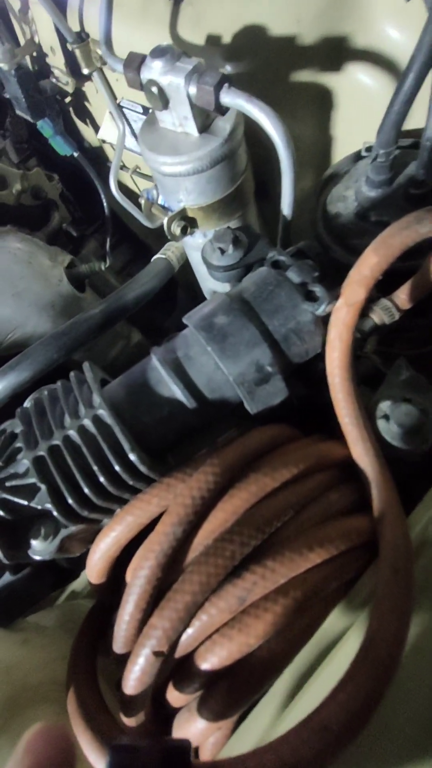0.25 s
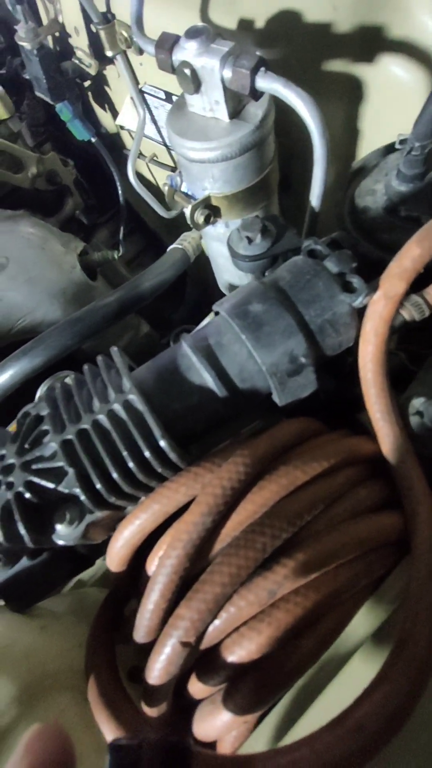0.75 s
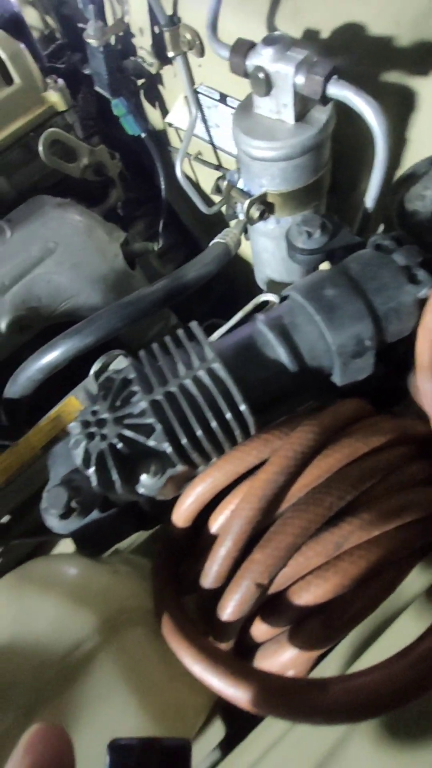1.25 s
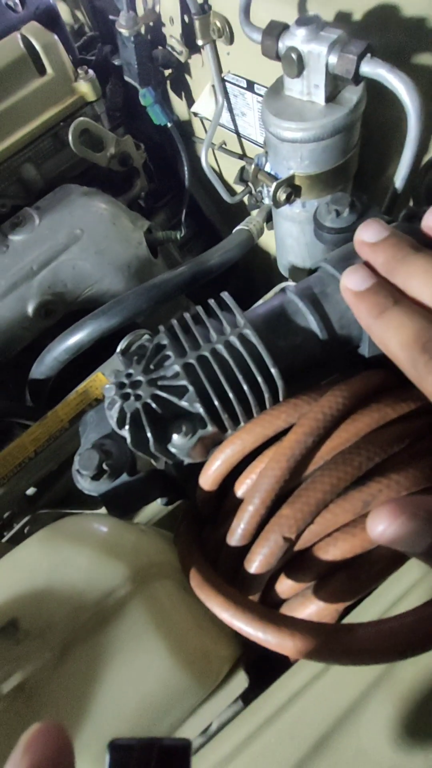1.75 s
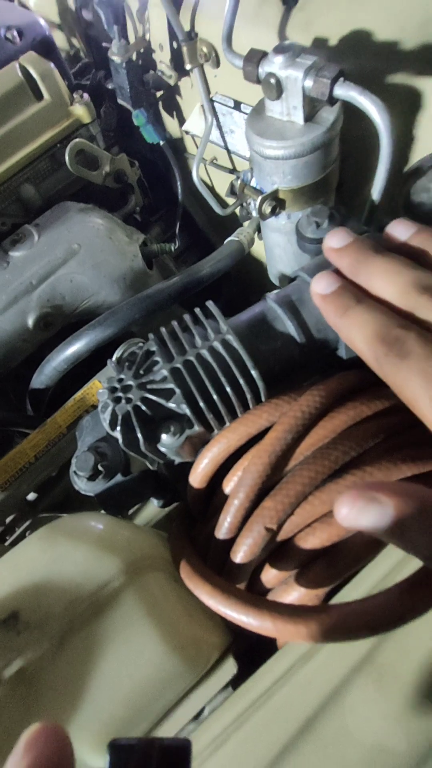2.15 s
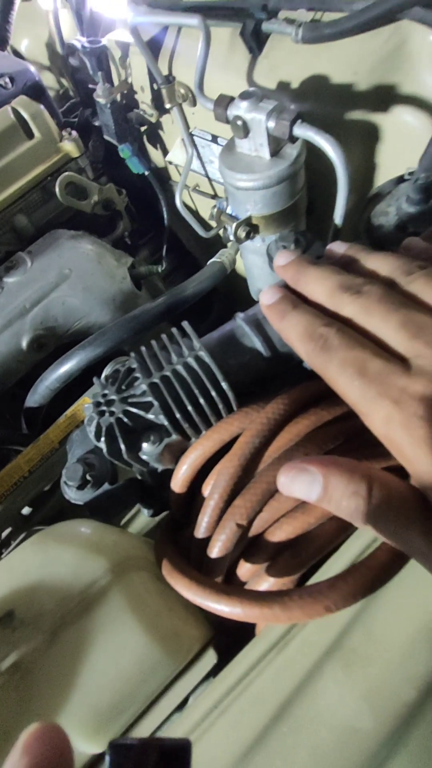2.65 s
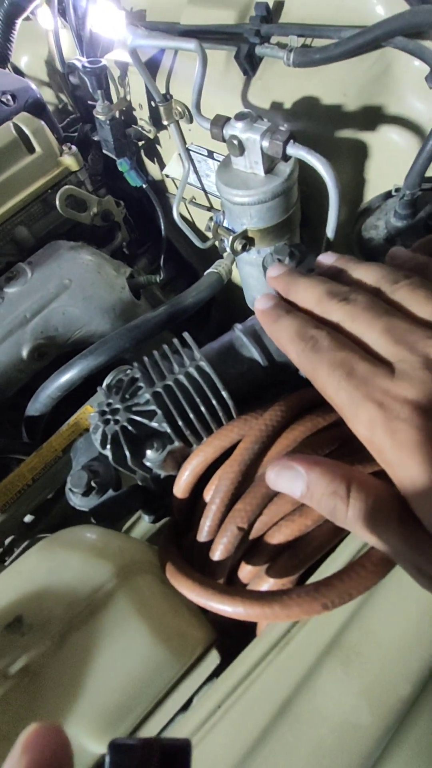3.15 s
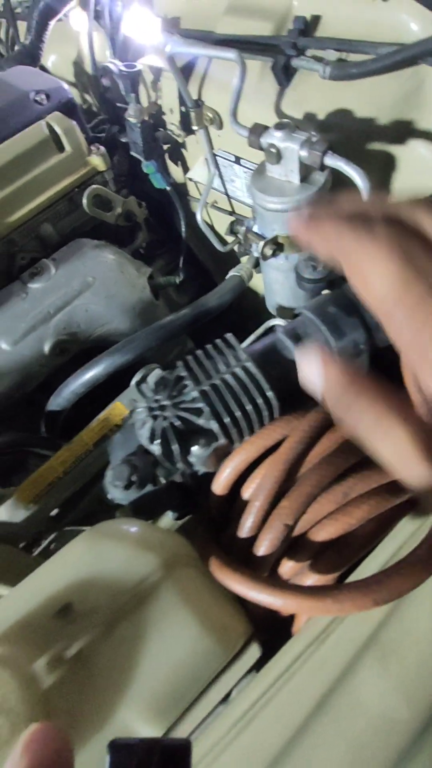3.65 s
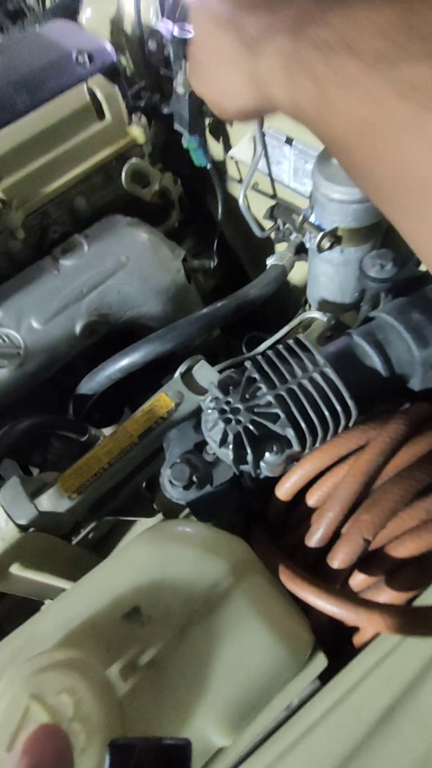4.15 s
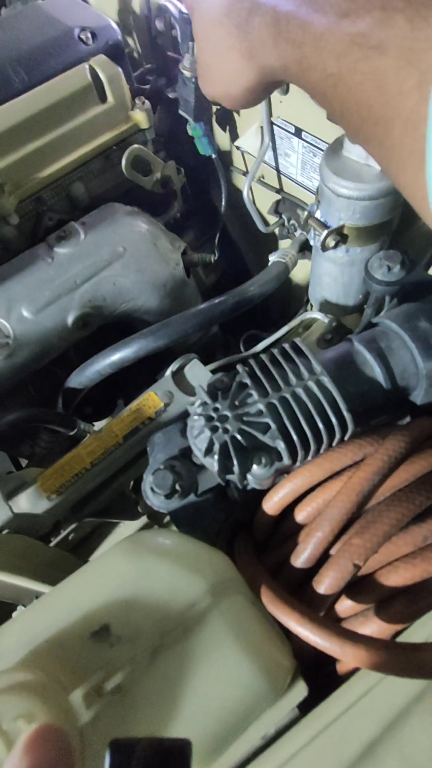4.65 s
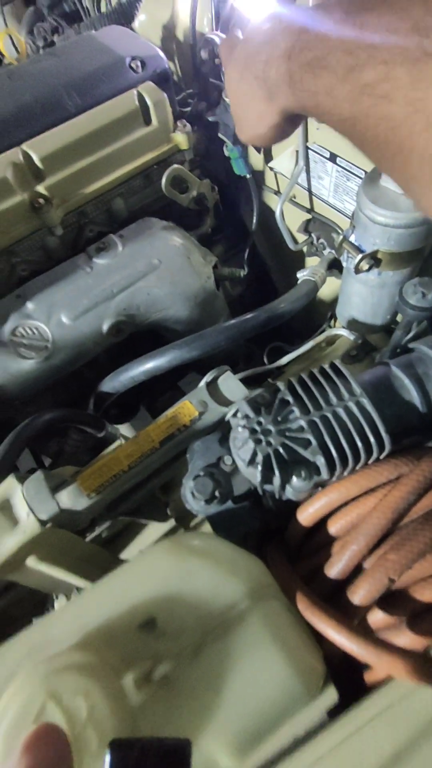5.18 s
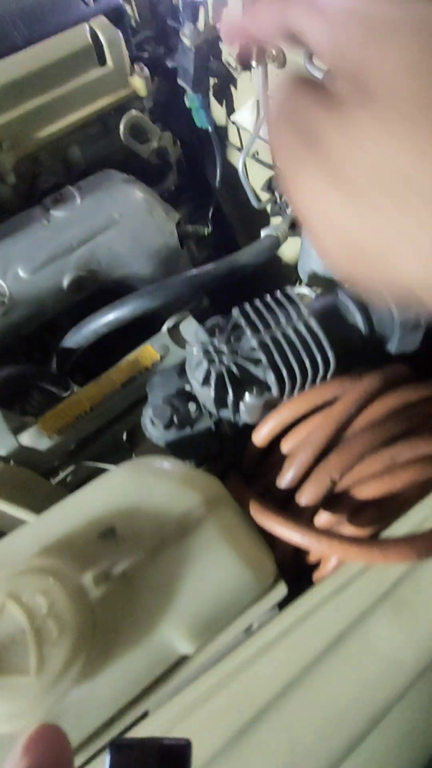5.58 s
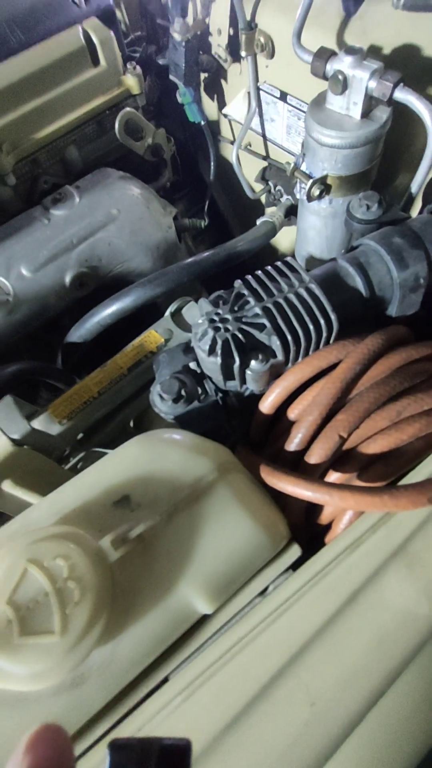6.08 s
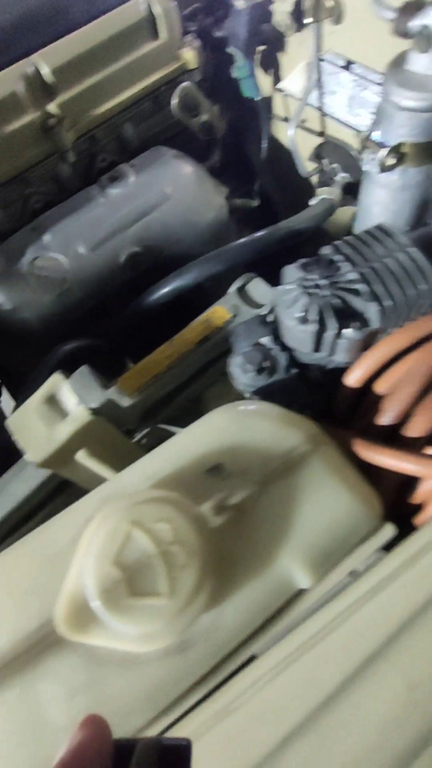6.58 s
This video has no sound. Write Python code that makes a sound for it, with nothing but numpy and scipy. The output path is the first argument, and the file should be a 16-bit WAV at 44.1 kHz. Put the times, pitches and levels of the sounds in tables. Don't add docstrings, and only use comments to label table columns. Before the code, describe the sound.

Loud rapid metallic valve rattle and harsh air hiss run for five seconds, stop dead with a short thud, then near silence with tiny ticks.

```python
import sys
import numpy as np
from scipy import signal
from scipy.fft import rfft, irfft, next_fast_len
from scipy.io import wavfile

SR = 44100
rng = np.random.default_rng(int(sys.argv[2]) if len(sys.argv) > 2 else 0)


def field_ratio(decibels):
    return 10 ** (np.asarray(decibels, dtype=float) / 20)


def digitize_waveform(pressure):
    field = np.atleast_2d(pressure).T
    bounded = np.clip(field, -1, 1)
    quanta = np.round(bounded * 32767).astype(np.int16)
    wavfile.write(sys.argv[1], SR, quanta)


N = 300762
T = np.arange(N) / SR
POWER_OFF_S = 4.8651
RIGHT_LAG_S = .00013
POSES = np.arange(5) / 2


def rms_one(x):
    return x / np.sqrt(np.mean(x ** 2) + 1e-20)


def in_time(rows):
    s, *columns = np.transpose(rows)
    return [np.interp(T, s, column) for column in columns]


def gauss(s, half_s):
    return np.exp(-((T - s) / half_s) ** 2)


def sos_filter(x, order, hz, kind):
    return signal.sosfilt(signal.butter(order, hz, kind, fs=SR, output="sos"), x)


def colour(x, points):
    hz, db = np.transpose(points)
    size = next_fast_len(N)
    bins_hz = np.arange(1, size // 2 + 2) * SR / size
    gain = field_ratio(np.interp(np.log(bins_hz), np.log(hz), db))
    return irfft(rfft(x, size) * gain, size)[..., :N]


def drift(rate_hz):
    r = np.exp(-80 * np.pi * rate_hz / SR)
    slow = signal.lfilter([1], [1, -2 * r, r * r], rng.standard_normal(N // 40 + 2002))[2000:]
    return np.interp(np.arange(N) / 40, np.arange(len(slow)), rms_one(slow))


def resonate(x, hz, width_hz):
    r = np.exp(-np.pi * width_hz / SR)
    poles = [1, -2 * r * np.cos(2 * np.pi * hz / SR), r * r]
    return signal.lfilter([(1 - r * r) / 2, 0, (r * r - 1) / 2], poles, x)


def ring(clicks, hz, t60_s):
    r, w = field_ratio(-60 / (t60_s * SR)), 2 * np.pi * hz / SR
    return signal.lfilter([0, np.sin(w)], [1, -2 * r * np.cos(w), r * r], clicks + 1e-18)


def click_at(s, db):
    return (np.arange(N) == round(s * SR)) * field_ratio(db)


# start_s [s], speed [strokes/s]
CRANK_SPEED = [(0, 43.375), (.8, 43.765), (1.1, 44.039), (3.2, 44.123), (4.4, 44.615), (4.6, 45.269),
               (4.87, 45.027)]
FIRST_STROKE, LAST_STROKE, COAST_S = .199, 218.9, .096


def crank():
    speed = in_time(CRANK_SPEED)[0] * np.exp(-np.maximum(T - POWER_OFF_S, 0) / COAST_S)
    return np.minimum(FIRST_STROKE + np.cumsum(speed) / SR, LAST_STROKE)


# pitch_hz [Hz], t60_s [s],
# left_db at poses 0, .5, 1, 1.5, 2 [dB], right_db at the same poses [dB]
VALVE_MODES = [(1015, 0.062, 1, 0, -8, 0, 0, -36.5, -36, -36, -17, -3),
               (1109, 0.2, -37, -30, -31, -9, -2, -43, -42, -43.5, -37, -26),
               (1198, 0.14, -25, -22, -25.5, -15.5, 1, -30.5, -30, -34, -31, -7),
               (1290, 0.051, -24, -18, -14, -5.5, 11.5, -20.5, -23, -24, -20, 0),
               (1355.3, 0.021, 7, 7.5, 6, 7.5, -2.5, -31, -27, -28, -11, 4.5),
               (1480, 0.02, 2, -7, -5.5, -15, -11, -7.5, -8, -12, -3, -23),
               (1567, 0.015, 10, -1, -4.5, -16, 14, 8, 0, 3.5, -6, -8),
               (1943, 0.013, 13, 9, 7, 9, 11, 6.5, 3.5, -1, -16, -15.5),
               (2095, 0.014, -8.5, 0.5, 0, 3, 6, -20.5, -16.5, -2.5, 0.5, 2),
               (2433, 0.017, -30, -8, 0, -10, -31, -15.5, -2.5, 4, -5.5, -26),
               (2773, 0.013, 9.5, -10, -15, -12, -12, 8, 2, 3, 6, 0.5),
               (3880, 0.0088, -20.5, -23.5, -30, -32, -34, 9.5, 5.5, 6.5, 9, 3.5),
               (4400, 0.018, -23.5, -20, -26, -29, -31, -35, -24, -16.5, -12, -2)]
SLAM_SCATTER_S, SLAM_SCATTER_DB, STROKE_SCATTER_DB = .00002, 1.0, .6
SEAT_T60_S = 0.007
HEAD_CUT_HZ = 1488


def valve(strokes, clack_db, bright_db, pose):
    at = np.flatnonzero(np.diff(np.floor(strokes)) > 0)
    chance = rng.standard_normal((len(at), 2 + len(VALVE_MODES)))
    at = np.clip(at + np.round(SLAM_SCATTER_S * SR * chance[:, 0]).astype(int), 0, N - 9)
    weak_db = -7.5 * np.clip(strokes[at] - 216.4, 0, 2)
    out = np.zeros((2, N))
    for k, (hz, t60_s, *pose_db) in enumerate(VALVE_MODES):
        for side, by_pose_db in enumerate(np.reshape(pose_db, (2, 5))):
            level_db = np.interp(pose[at], POSES, by_pose_db) + SLAM_SCATTER_DB * chance[:, k + 1]
            level_db += STROKE_SCATTER_DB * chance[:, -1] + bright_db[at] * np.log2(hz / 1600)
            clicks = np.zeros(N)
            clicks[at + side * round(RIGHT_LAG_S * SR)] = field_ratio(clack_db[at] + weak_db + 13.5 + level_db)
            out[side] += ring(clicks, hz, t60_s) - ring(clicks, hz, SEAT_T60_S)
    return sos_filter(out, 7, HEAD_CUT_HZ, "high")


# pitch_hz [Hz], level_db [dB per Hz]
JET_LEFT_COLOUR = [(30, -7.5), (300, -12.5), (1000, -33), (1500, -20.5), (2500, -11), (3200, -11),
                   (5000, -12), (7500, -21), (9800, -12), (11000, -18), (13000, -20), (16000, -26.5)]
JET_RIGHT_COLOUR = [(30, -41.5), (300, -28.5), (1000, -19.5), (1500, -14.5), (2500, -8.5), (3200, -8.5),
                    (4700, -2.5), (6500, -9), (8000, -11), (10000, -20), (11500, -30), (16000, -17.5)]
# pitch_hz [Hz], width_hz [Hz], level_db at poses 0, .5, 1, 1.5, 2 [dB]
LEFT_CAVITIES = [(3030, 210, -36, -17, -17.5, -26, -4.5), (3590, 780, -5.5, -5, -1.5, -3.5, -11),
                 (4120, 130, -8, -22.5, -22, -5, -2), (4630, 200, -13.5, -17.5, -27, -5, -13),
                 (5740, 360, -27, -27, -24.5, -22, -34), (5515, 190, -18.5, -2.5, -24, -9, -7),
                 (6100, 1280, -6, -11, -24.5, -13.5, -6), (6795, 170, 2, -4, 6.5, -0.5, -1),
                 (7290, 320, -6, -2, 2.5, 0, -15), (8280, 520, 4, 8.5, 0, 6.5, -1.5),
                 (9040, 500, 1, 2, -4, -1.5, -6.5), (9930, 1030, -5.5, -4, -4.5, -3, -7.5),
                 (10630, 200, -31, -25.5, -3, -32, -12)]
RIGHT_CAVITIES = [(2966, 110, -14.5, -7.5, -25.5, -7, -14), (3760, 120, 7.5, -2, 6, -2, 2.5),
                  (4160, 400, 1.5, -7, 4, -10, -11), (4516, 130, -15.5, 7.5, 0, 5, -15),
                  (5298, 610, -2.5, 1, -2, 0.5, -8.5), (5824, 200, -10.5, 9, 4.5, 6, 8),
                  (6590, 460, -9, -22.5, -31, -11, -2), (7180, 330, -15.5, -14, -2.5, -12, -18),
                  (8500, 150, -16.5, -26, -6, -21, -28), (9100, 260, -16, -28.5, -29, -23, -16),
                  (9540, 340, -11.5, -18, -17.5, -23, -28), (11600, 290, -21.5, -22, -24, -20, -17),
                  (12680, 480, -35, -25, -29.5, -25, -23.5)]
JET_SHARED = .62
JET_PAN_DB, JET_PAN_DB_PER_POSE = 3, -2
SAG_S, SAG_DB_PER_S, SHUT_S, SHUT_T60_S = 4.95, 55, 5.021, .036
PUMP_FADE_DB_PER_S = 43


def jet(strokes, jet_db, pose):
    common, *own = rng.standard_normal((3, N))
    puff_db = 0.49 * np.cos(2 * np.pi * (strokes - .1))
    flutter_db = 0.12 * drift(9.3) + .5 * drift(73) + puff_db
    sag_db = -SAG_DB_PER_S * np.clip(T - SAG_S, 0, SHUT_S - SAG_S)
    shut_db = sag_db - 60 * np.maximum(T - SHUT_S, 0) / SHUT_T60_S
    ports = [(JET_LEFT_COLOUR, LEFT_CAVITIES), (JET_RIGHT_COLOUR, RIGHT_CAVITIES)]
    out = np.zeros((2, N))
    for side, (broad, cavities) in enumerate(ports):
        shared = np.roll(common, side * round(RIGHT_LAG_S * SR))
        air = np.sqrt(JET_SHARED) * shared + np.sqrt(1 - JET_SHARED) * own[side]
        out[side] = colour(air, broad)
        for k, (hz, width_hz, *pose_db) in enumerate(cavities):
            level_db = np.interp(pose, POSES, pose_db) + 0.48 * drift(4.0)
            once = resonate(air, hz, 1.155 * width_hz)
            out[side] += (-1) ** k * field_ratio(level_db) * resonate(once, hz, 1.155 * width_hz)
    pump_band = signal.butter(2, [1080, 2660], "band", fs=SR, output="sos")
    pumped = signal.sosfiltfilt(pump_band, out)
    pump_gain = field_ratio(-PUMP_FADE_DB_PER_S * np.maximum(T - POWER_OFF_S, 0))
    out = sos_filter(out, 4, 260, "high") - pumped * (1 - pump_gain)
    pan_db = (JET_PAN_DB + JET_PAN_DB_PER_POSE * pose) * [[.5], [-.5]]
    return field_ratio(jet_db + 11.5 + flutter_db + shut_db + pan_db) * out, field_ratio(jet_db + shut_db) * common


# order [multiple of stroke rate], level_db [dB]
SHAKE_ORDERS = [(5, -62.5), (6, -58.5), (6.8, -54.5), (8, -62.5), (10, -62.5)]
# start_s [s], pitch_hz [Hz], t60_s [s], level_db [dB]
MOUNT_JOLTS = [(4.93, 157, 0.2, -42), (4.933, 257, 0.2, -38), (4.935, 398, 0.15, -46),
               (4.941, 580, 0.12, -52), (4.94, 710, 0.1, -52)]
JOLT_BOUNCES, JOLT_GAP_S, JOLT_LOSS_DB = 5, 0.014, -0.5


def housing(strokes):
    running = np.clip(216.0 - strokes, 0, 1)
    tones = np.zeros(N)
    for order, db in SHAKE_ORDERS:
        turns = order * (strokes + 0.013 * drift(12.0)) + rng.random()
        tones += field_ratio(db + 1.5 + 3.6 * drift(2.3)) * np.sin(2 * np.pi * turns)
    rocking = np.zeros(N)
    for s, hz, t60_s, db in MOUNT_JOLTS:
        for k in range(JOLT_BOUNCES):
            bounce_s = s + JOLT_GAP_S * k * rng.uniform(.7, 1.3)
            rocking += ring(click_at(bounce_s, db - 3.0 - JOLT_LOSS_DB * k), hz, .45 * t60_s)
    swell = np.clip((T - MOUNT_JOLTS[0][0]) / 0.005, 0, 1)
    return running * tones + swell ** 2 * rocking


# delay_ms [ms], shift_ms [ms per pose], level_db [dB]
BAY_REFLECTIONS = [
    [(2.05, -0.069, -6.5), (4.7, 0.083, -17), (7.9, -0.23, -10)],
    [(1.5, 0.0095, -7), (5.6, -0.17, -12.5), (8.8, 0.196, -9)],
]


def bay(x, pose, sway_ms, extra_db):
    out = x.copy()
    for side, echoes in enumerate(BAY_REFLECTIONS):
        for ms, per_pose_ms, db in echoes:
            delay_s = (ms + per_pose_ms * pose + sway_ms) / 1000
            out[side] += field_ratio(db + extra_db) * np.interp(T - delay_s, T, x[side], left=0)
    return out


# pitch_hz [Hz], level_db [dB]
GARAGE_SPECTRUM = [(800, -28), (1800, -5.5), (3000, 1.5), (4500, 11), (6500, 2.5), (9000, 5), (12000, -14),
                   (16000, -19)]
GARAGE_T60_S, GARAGE_DB, GARAGE_PAN_DB = 0.58, -20.5, 2.5


def garage(x):
    s = np.arange(SR) / SR
    tail = rng.standard_normal((2, SR)) * field_ratio(-60 * s / GARAGE_T60_S) * (s > .012)
    wet = signal.fftconvolve(x[None], tail / np.sqrt(np.sum(tail[0] ** 2)), axes=1)[:, :N]
    pan_db = GARAGE_PAN_DB * np.array([[.5], [-.5]])
    return field_ratio(GARAGE_DB + pan_db) * colour(wet, GARAGE_SPECTRUM)


# start_s (centre) [s], half_s [s], level_db [dB]
CLOTH_BRUSHES = [(5.43, 0.022, -61), (5.479, .02, -52.5), (5.51, .02, -66), (6.09, .05, -68),
                 (6.39, 0.02, -72), (6.658, 0.045, -62)]
# start_s [s], level_db (peak) [dB], pitch_hz [Hz], pan_db (left minus right) [dB]
COOLING_TICKS = [(6.2345, -44, 3300, -6), (6.78, -45, 4130, -5), (6.8037, -51, 4000, -5)]
TICK_CUT_HZ = 5900


def small_noises():
    brush = sum(field_ratio(db) * gauss(s, half_s) for s, half_s, db in CLOTH_BRUSHES)
    cloth_points = [(300, 9), (700, 6), (2500, 4), (5000, 5.5), (9000, -7.0), (14000, -17)]
    out = brush * rms_one(colour(rng.standard_normal((2, N)), cloth_points))
    for s, db, hz, pan_db in COOLING_TICKS:
        tick = ring(click_at(s, db), hz, .004)
        tick += ring(click_at(s, db - 2), 1.3 * hz, .003)
        tick += ring(click_at(s, db - 5), 1.7 * hz, .003)
        tick = sos_filter(tick, 2, [2300, TICK_CUT_HZ], "band")
        out += 1.2 * tick * field_ratio([[pan_db / 2], [-pan_db / 2]])
    return out


BUMP_S, BUMP_DB, BUMP_HZ = 6.263, -35, 500


def bump():
    knock = 14.0 * click_at(BUMP_S, BUMP_DB) + 1e-18
    return sos_filter(knock, 2, BUMP_HZ, "low") * [[1], [-1]]


# start_s [s], drone_db (low orders) [dB], upper_db (high orders) [dB]
ENGINE_LEVELS = [(0, -52, -47), (.15, -42, -38), (.9, -42.5, -44), (1.4, -46, -40), (2.3, -47, -37.5),
                 (2.6, -54.5, -40.5), (3.1, -55, -40.5), (3.5, -57, -54), (4.9, -57, -47),
                 (5.4, -54.5, -57), (5.6, -52.5, -50), (5.8, -66, -49.5), (6.0, -59, -52.5),
                 (6.3, -58, -53), (6.58, -77, -69), (6.82, -79, -64)]
# start_s (centre) [s], half_s [s], change [share of idle speed]
REV_CHANGES = [(3.52, .2, -.095), (5.3, .07, -.05), (5.72, .25, .12), (6.4, .3, .055), (6.85, .15, .06)]
# pitch_hz [Hz], width_hz [Hz], level_db [dB]
EXHAUST_MODES = [(121, 60, -8), (141, 54, 1), (142, 34, -6.5), (306, 84, -16.5), (417, 150, -22.5),
                 (677, 240, -28), (890, 118, -39)]
# order [multiple of firing rate], level_db [dB]
DRONE_ORDERS = [(4, -17), (5, 0), (6, -5), (10, -12), (11, -15), (12, -16), (15, -21), (20, -26), (26, -25),
                (30, -20), (50, -22), (60, -23)]
IDLE_HZ, IDLE_START, IDLE_SAG_PER_S = 29.0, 1.012, .008
EXHAUST_DB, OFF_IDLE_LOSS_DB, UNEVEN, UNEVEN_OFF_IDLE, DRONE_STUMBLE = -5.5, 89, 0.0295, 0.45, .3
DRONE_WAVER_DB, DRONE_PATCHES_DB = 1.8, 5


def engine():
    drone_db, upper_db = in_time(ENGINE_LEVELS)
    speed = IDLE_START - IDLE_SAG_PER_S * T
    speed += sum(change * gauss(s, half_s) for s, half_s, change in REV_CHANGES)
    off_idle = np.abs(speed - 1)
    exhaust_db = drone_db + EXHAUST_DB - OFF_IDLE_LOSS_DB * off_idle
    uneven = UNEVEN + UNEVEN_OFF_IDLE * off_idle

    firings = np.cumsum(IDLE_HZ * speed * (1 + uneven * drift(24.26))) / SR
    pulses = np.diff(np.floor(firings), prepend=0) * field_ratio(20 * uneven * drift(45))
    pulses += 0.0029 * rng.standard_normal(N)
    exhaust = np.zeros(N)
    for k, (hz, width_hz, db) in enumerate(EXHAUST_MODES):
        exhaust += (-1) ** k * field_ratio(db) * resonate(pulses, hz, width_hz)
    exhaust = rms_one(sos_filter(exhaust, 3, [100, 1500], "band"))

    stumble = (0.0035 + DRONE_STUMBLE * off_idle) * drift(7.36)
    turns = np.cumsum(IDLE_HZ * speed * (1 + stumble)) / SR
    drone = np.zeros(N)
    for order, db in DRONE_ORDERS:
        course_db = drone_db if order < 8 else upper_db
        waver_db = DRONE_WAVER_DB * drift(30) if order < 14 else DRONE_PATCHES_DB * (drift(4) - 1)
        tone = np.sin(2 * np.pi * (round(order) * turns + rng.random()))
        drone += field_ratio(course_db + db + waver_db) * tone
    return field_ratio(exhaust_db) * exhaust + drone


# start_s (centre) [s], level_db [dB]
STREET_PASSES = [(.64, -68), (1.1, -51), (1.4, -54), (2.6, -59), (3.3, -58), (3.55, -51.5), (3.9, -57),
                 (4.2, -67), (4.65, -66), (5.15, -57), (5.4, -62), (5.75, -73), (6.1, -60), (6.35, -62)]
STREET_FLOOR_DB, PASS_S, STREET_LUMPS_DB = -67, .13, 2.0


def street():
    traffic = field_ratio(STREET_FLOOR_DB) + sum(field_ratio(db) * gauss(s, PASS_S) for s, db in STREET_PASSES)
    rumble_points = [(20, -37.5), (45, 2.5), (80, -16.5), (105, 13.0), (160, 1.0), (300, -42)]
    rumble = rms_one(colour(rng.standard_normal(N), rumble_points))
    return traffic * field_ratio(STREET_LUMPS_DB * drift(5.4)) * rumble


# pitch_hz [Hz], level_db [dB per Hz]
AIR_SPECTRUM = [(25, -54.5), (45, -38), (88, -8), (150, -2.5), (227, -10.5), (297, -12), (491, -17),
                (889, -19.5), (1390, -25.5), (1960, -26), (4480, -29), (5170, -28.5), (5970, -36.5),
                (7410, -29), (8870, -37), (11000, -49.5), (14300, -60), (22000, -120)]
# pitch_hz [Hz], width_hz [Hz], level_db [dB]
SEEP_BANDS = [(2100, 540, -78), (5150, 790, -69), (7400, 600, -76.5), (12000, 3700, -85.5),
              (15000, 2900, -81.5)]
FLOOR_DB, AIR_DB = -58.5, 2
LULL_S, LULL_HALF_S, LULL_DB = 6.57, .05, -5


def background():
    mid, side = rng.standard_normal((2, N))
    side = sos_filter(side, 2, 300, "high")
    white = np.array([mid + side, mid - side])
    seep = np.zeros((2, N))
    for hz, width_hz, db in SEEP_BANDS:
        band = resonate(resonate(white, hz, width_hz), hz, width_hz)
        seep += field_ratio(db + 2.2 * drift(4.0)) * rms_one(band)
    swell_db = AIR_DB + .9 * drift(4) + LULL_DB * gauss(LULL_S, LULL_HALF_S)
    return field_ratio(FLOOR_DB + swell_db) * rms_one(colour(white, AIR_SPECTRUM)) + seep


# start_s [s], pose [0-2]
PHONE_POSE = [(0, 0.047), (.9, 0.15), (1.5, 0.66), (1.9, 0.49), (2.3, 0.72), (2.7, 0.85), (3.3, 1.12),
              (3.7, 1.53), (4.3, 1.73), (5, 1.89)]
# start_s [s], level_db [dB], brightness [dB per octave]
SLAM_FORCE = [(0, 1, -1.5), (.2, 1.5, -3), (.6, 2, -1.5), (1, 3, 2.5), (1.5, 4, 4), (2, 3, 4),
              (2.5, 3, -0.5), (3, 3, -4.5), (3.3, 3, -3), (3.5, 2.5, 4), (3.8, 0, 3.5), (4.1, 0.5, -0.5),
              (4.5, 0.5, -1.5), (4.9, 0.5, 3)]
# start_s [s], level_db [dB]
AIR_FLOW = [(0, 1), (.3, 1.5), (.63, 2), (1, .5), (1.4, 0), (1.58, -1), (1.9, 0), (2.3, 0.5), (2.7, -0.5),
            (3.15, -1), (3.5, 0), (3.7, -0.5), (4.1, 0.5), (4.5, 0), (4.95, 1.5)]
CLACK_DB, CLACK_DB_PER_POSE, CLACK_WANDER_DB, CLACK_WANDER_HZ = -36.5, .5, .3, 1.0
JET_DB, JET_DB_PER_POSE, JET_WANDER_DB = -26.5, -0.77, .3


def scene():
    strokes = crank()
    pose, = in_time(PHONE_POSE)
    slam_db, bright_db = in_time(SLAM_FORCE)
    flow_db, = in_time(AIR_FLOW)
    clack_db = CLACK_DB + CLACK_DB_PER_POSE * pose + CLACK_WANDER_DB * drift(CLACK_WANDER_HZ) + slam_db
    jet_db = JET_DB + JET_DB_PER_POSE * pose + JET_WANDER_DB * drift(0.74) + flow_db
    sway_ms = 0.052 * drift(0.28)

    clack = bay(valve(strokes, clack_db, bright_db, pose), pose, sway_ms, extra_db=-0.5)
    at_ports, open_jet = jet(strokes, jet_db, pose)
    compressor = clack + bay(at_ports, pose, sway_ms, extra_db=-6.5)
    room = garage(open_jet + clack[0])
    shake = sos_filter(housing(strokes), 2, 110, "high")
    bass = (shake + engine() + street()) * field_ratio([[.4], [-.4]])
    return compressor + room + bass + background() + small_noises() + bump()


def low_pass(x):
    return signal.sosfilt(signal.butter(12, 16820, fs=SR, output="sos"), x)


def record(dry):
    top_cut = signal.ellip(10, .5, 70, 15950, fs=SR, output="sos")
    finished = signal.sosfilt(top_cut, dry)
    return low_pass(finished)


dry = scene()
out = record(dry)
digitize_waveform(out)
```